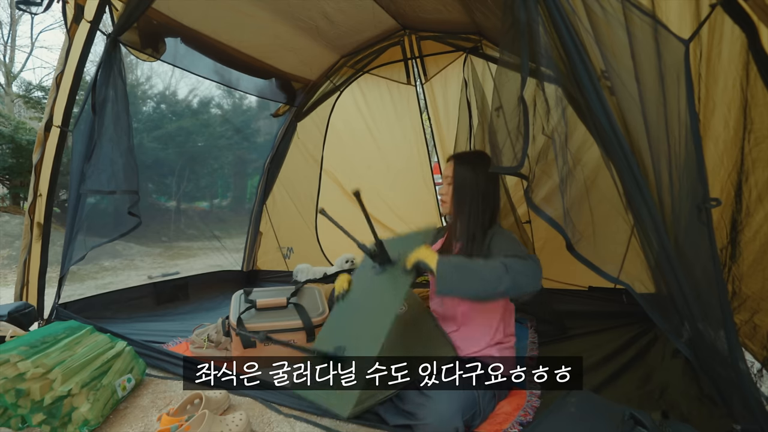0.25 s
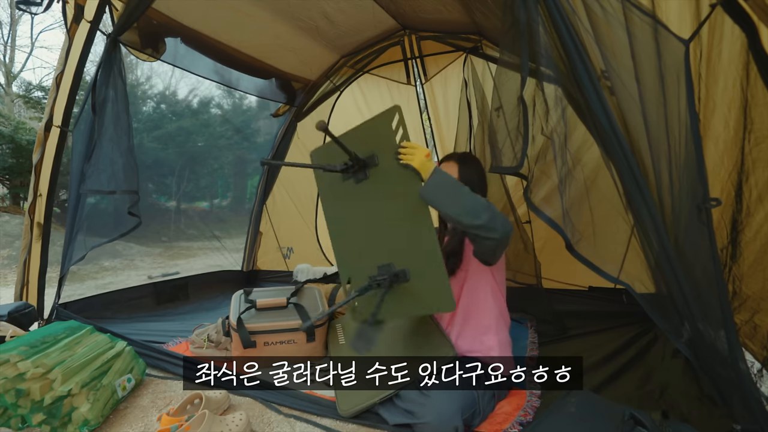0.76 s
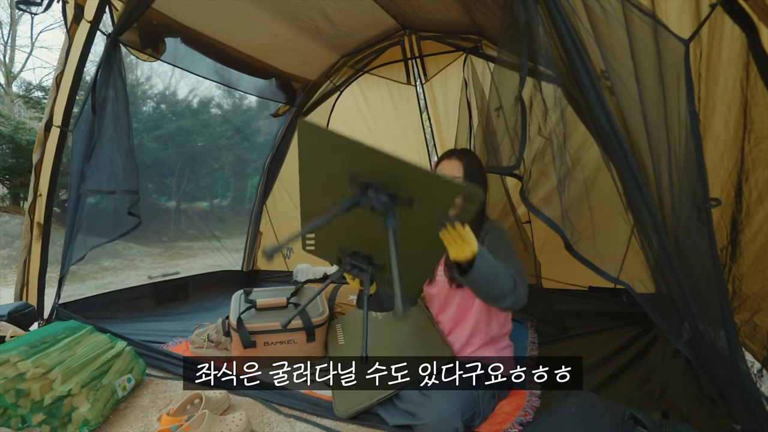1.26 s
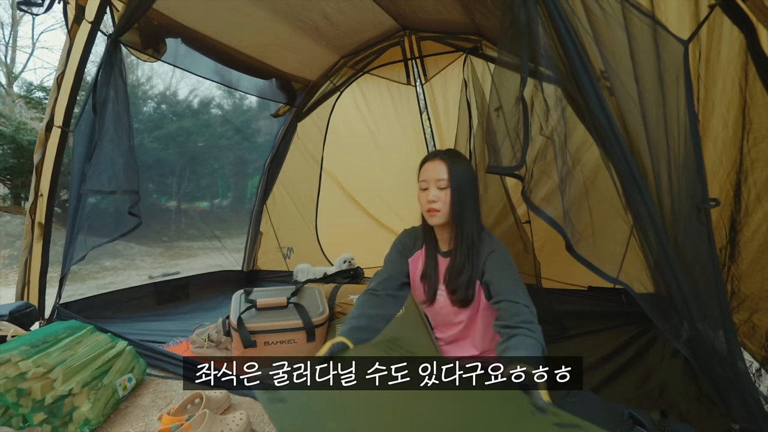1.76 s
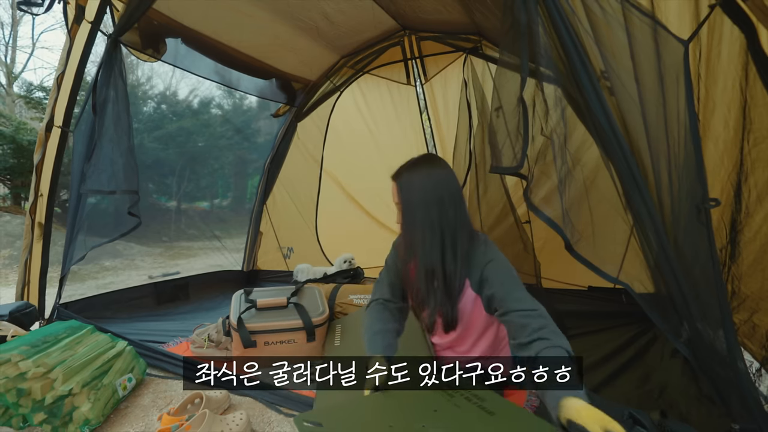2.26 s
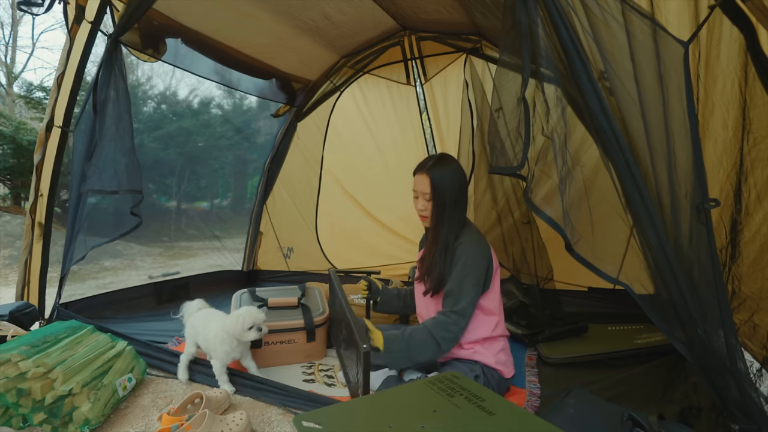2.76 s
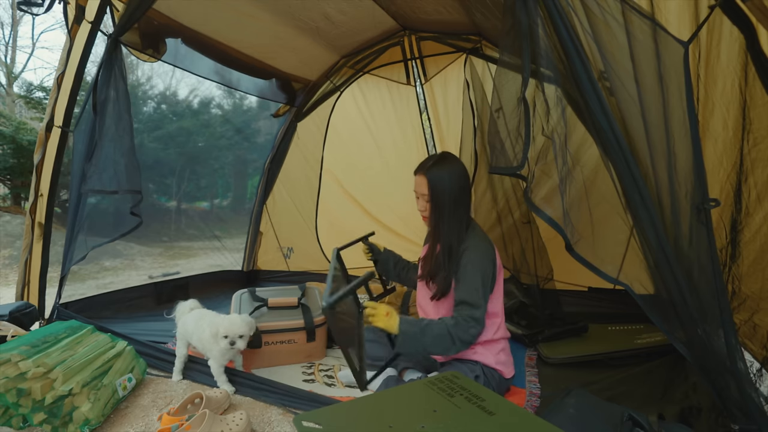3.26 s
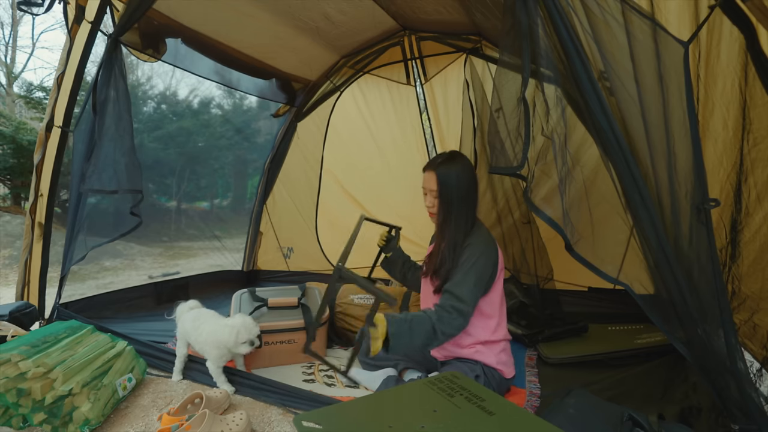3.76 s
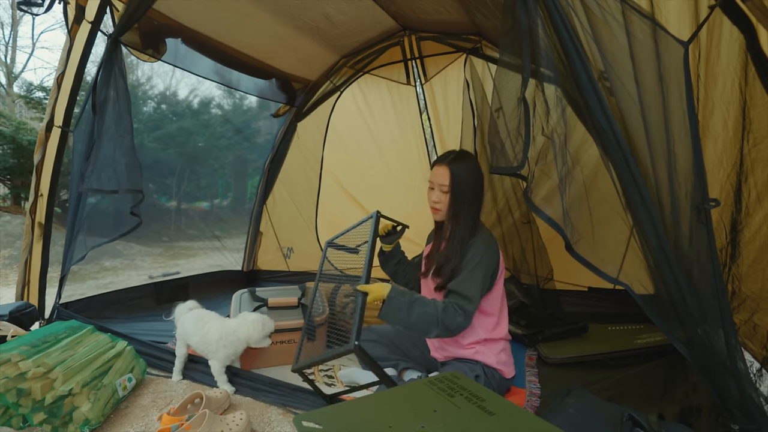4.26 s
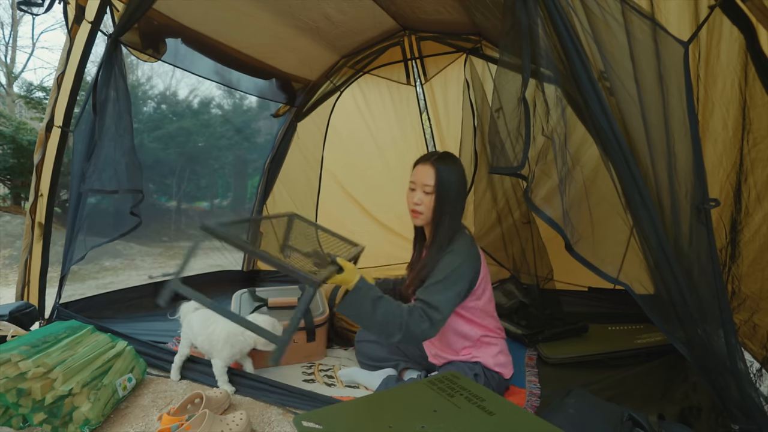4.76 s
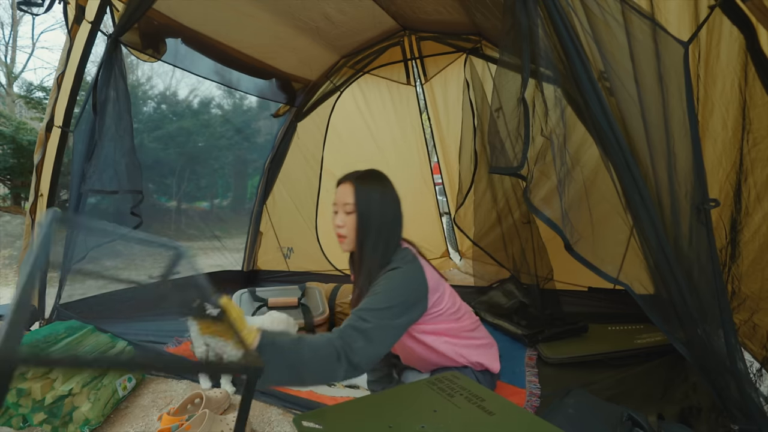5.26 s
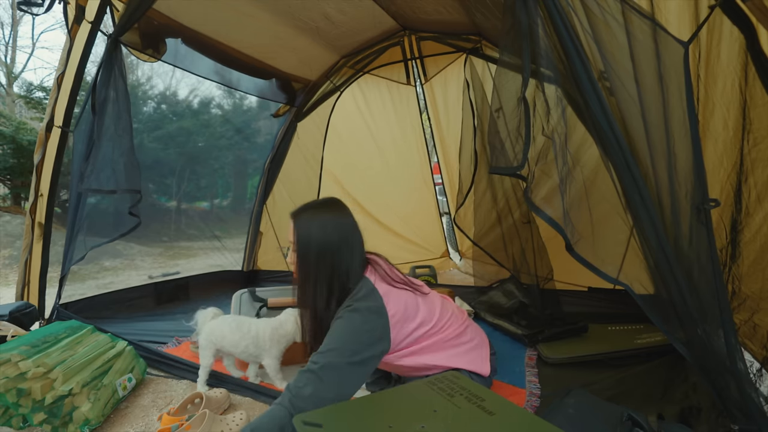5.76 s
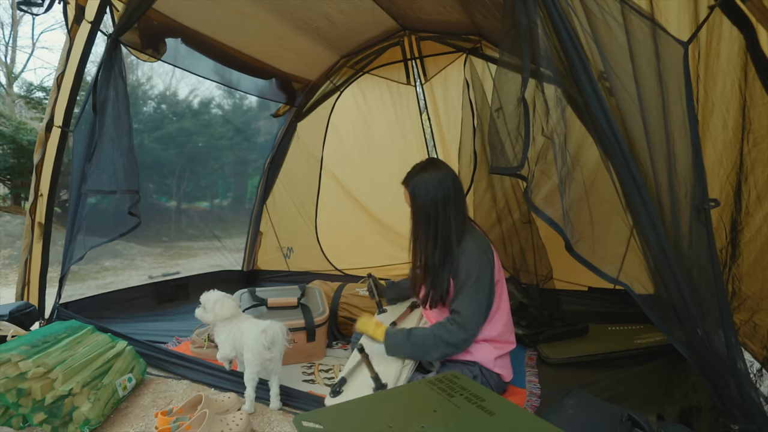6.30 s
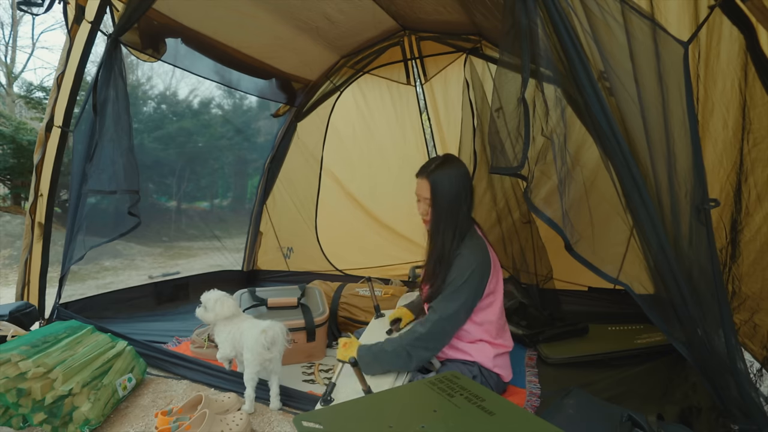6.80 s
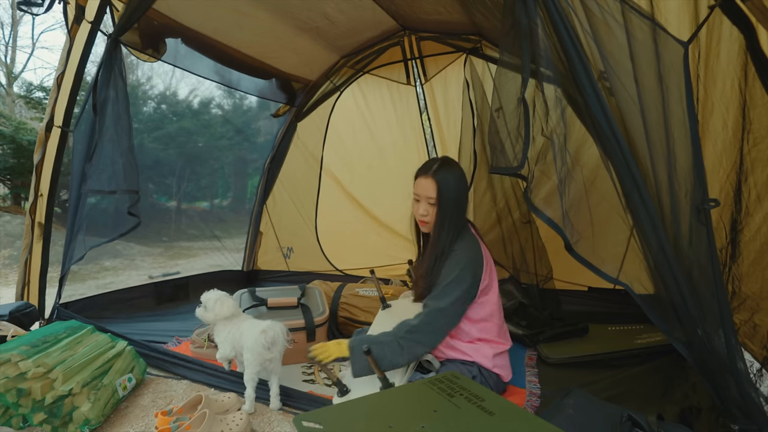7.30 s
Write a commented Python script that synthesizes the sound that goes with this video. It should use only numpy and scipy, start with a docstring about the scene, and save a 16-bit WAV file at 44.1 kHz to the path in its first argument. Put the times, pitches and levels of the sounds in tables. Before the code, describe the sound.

Gloved hands rustle, drag and set up three small camping tables: hollow metal bangs, sharp ringing steel snaps, a deep floor thump, woody knocks.

```python
"""Inside a tent, a few steps from the microphone: faint air and a rustle of sleeves and gloves throughout.
First a metal-topped table is dragged, knocked and stood on its legs: filtered slips, then decaying modes.
Next a steel mesh table clacks as it snaps open, rings, and creaks; wavering tones make the squeaks.
Its feet slap the floor with a thud, a slowly rising swing; last, a small board table is rubbed and knocked."""
import sys
import numpy as np
from scipy import signal
from scipy.fft import rfft, irfft, next_fast_len
from scipy.io import wavfile

SR = 44100
rng = np.random.default_rng(int(sys.argv[2]) if len(sys.argv) > 2 else 0)


def dump(signal):
    """Clip the signal to [-1, 1] and save it as 16-bit WAV at the path in sys.argv[1]."""
    limited = np.clip(np.atleast_2d(signal).T, -1, 1)
    pcm = np.round(limited * 32767).astype(np.int16)
    wavfile.write(sys.argv[1], SR, pcm)


N = 332514  # length in samples


def amp(db):
    """Decibels to gain."""
    return 10 ** (np.asarray(db) / 20)


def unit(x):
    """Scale to rms 1."""
    return x / np.sqrt(np.mean(x ** 2) + 1e-18)


def add(out, s, x):
    """Mix x into out from time s on."""
    i = max(int(s * SR), 0)
    out[i:i + len(x)] += x[:max(N - i, 0)]


def decay(t, t60):
    """Ring dying away by 60 dB in t60 seconds."""
    return np.exp(-np.log(1000) * t / t60)


def bins(size):
    """Frequencies of an FFT, kept above zero."""
    return np.maximum(np.arange(size // 2 + 1) * SR / size, 1)


def shape(f, points, tilt_db=0):
    """Gain at frequencies f of a spectrum, tilted per octave above its first point."""
    hz, db = np.transpose(points)[:2]
    octaves = np.log2(np.maximum(f, hz[0]) / hz[0])
    return amp(np.interp(np.log(f), np.log(hz), db) + tilt_db * octaves)


def colour(x, points, tilt_db=0):
    """Give x a spectrum; rms 1."""
    size = next_fast_len(len(x), True)
    spectrum = rfft(x, size) * shape(bins(size), points, tilt_db)
    return unit(irfft(spectrum, size)[:len(x)])


def walk(rate, size):
    """Random curve: rate normal draws per SR steps, joined by straight lines."""
    place = np.arange(size) * rate / SR
    count = int(place[-1]) + 2
    return np.interp(place, np.arange(count), rng.standard_normal(count))


def tent(x, count=28):
    """Ground, table tops and walls send back early echoes that comb the sound."""
    out = x.copy()
    lags_s = rng.uniform(.001, .03, count)
    for lag_s, sign in zip(lags_s, rng.choice([-1, 1], count)):
        i = int(lag_s * SR) + 1
        out[i:] += sign * 0.48 * np.exp(-lag_s / 0.0083) * x[:-i]
    return out


def friction(size, grain_db):
    """Tiny slips of uneven size, bunched where the surfaces catch."""
    catch_db = 1.6 * walk(55, size)
    return rng.standard_normal(size) * amp(grain_db * walk(900, size) + catch_db)


def strokes(rows, attack_share, release_s):
    """Gain of strokes that gather speed over a share of their length, hold, and die as the hand stops."""
    out = np.zeros(N)
    for s, length_s, db in rows:
        t = np.arange(int(length_s * SR) + SR // 2) / SR
        attack = 1 - np.exp(-t / (attack_share * length_s))
        release = np.exp(-np.maximum(t - length_s, 0) / release_s)
        add(out, s, amp(db) * attack * release)
    return out


def rub(rows, spectrum):
    """A hand's drags: friction, combed by the tent and coloured by the surface it stirs."""
    gain = strokes(rows, attack_share=0.16, release_s=0.06)
    return gain * colour(tent(friction(N, grain_db=2.5)), spectrum)


def contact(f, tilt_db, cut_hz):
    """A softer contact pushes for longer and leaves the high modes still."""
    octaves = np.log2(np.clip(f, 150, None) / 1000)
    return amp(tilt_db * octaves) / np.sqrt(1 + (f / cut_hz) ** 4)


def strike(body, modes, modes_db, crack, ragged_db, tilt_db, cut_hz, rise_s, size=32768, count=1100):
    """One blow: a crowd of weak modes and a few strong ones; rms 1 over the first count samples."""
    t, f = np.arange(size) / SR, bins(size)
    hz, _, t60 = np.transpose(body)
    # the upper modes cluster, with gaps between the clusters
    clusters = amp(ragged_db * walk(700, len(f)) * np.minimum(f / 1500, 1))
    crowd = np.exp(2j * np.pi * rng.random(len(f))) * shape(f, body) * clusters
    crowd *= contact(f, tilt_db, cut_hz) / np.std(irfft(crowd))
    # neighbouring bands of the crowd cross-fade, each with its own decay
    y = np.zeros(size)
    for row, life in zip(np.eye(len(hz)), t60):
        share = np.interp(np.log(f), np.log(hz), row)
        y += irfft(crowd * share) * decay(t, life)
    spots = rng.uniform(-1, 1, len(modes))
    for k, ((mode_hz, db, life), spot) in enumerate(zip(modes, spots)):
        # every mode starts from rest; the place of the blow decides how much it gets
        gain = amp(db + modes_db + 2 * spot) * contact(mode_hz, tilt_db, cut_hz)
        y += (-1) ** k * gain * np.sin(2 * np.pi * mode_hz * t) * decay(t, life)
    y *= 1 + crack * np.exp(-t / 0.0011)  # the direct sound leads the tent's reflections
    y *= 1 - np.exp(-t / rise_s)
    return y / np.std(y[:count])


def blows(rows, body, modes, modes_db, crack, ragged_db):
    """All the blows on one object; modes_db sets its strong modes against the crowd."""
    out = np.zeros(N)
    for s, db, tilt_db, cut_hz, rise_s in rows:
        hit = strike(body, modes, modes_db, crack, ragged_db, tilt_db, cut_hz, rise_s)
        add(out, s, amp(db) * hit)
    return out


def squeal(rows, partials):
    """A gliding, wavering, trembling tone with its partials, blurred twice by the tent's echoes."""
    wobbles_per_s, tremble_db = 450, 3
    out = np.zeros(N)
    for s, length_s, first_hz, last_hz, wobble_hz, db in rows:
        size = int(length_s * SR)
        hz = np.linspace(first_hz, last_hz, size) + wobble_hz * walk(wobbles_per_s, size)
        phase = 2 * np.pi * np.cumsum(hz) / SR
        tone = sum(amp(part_db) * np.sin(multiple * phase) for multiple, part_db in partials)
        tone *= np.hanning(size) * amp(tremble_db * walk(wobbles_per_s, size))
        echoed = tent(tent(np.pad(tone, (0, size))))
        add(out, s, amp(db) * unit(echoed) / np.sqrt(2))
    return out


# outdoor air reaching the microphone: [f/Hz, relative level per Hz/dB]
AIR_SPECTRUM = [(25, -6.5), (50, 4.5), (78, 12.5), (120, 4.5), (250, -9.5), (500, -12.5), (1000, -11),
                (2000, -12), (4300, -8), (5200, -33), (9000, -38), (14000, -21), (16000, -48)]


def air():
    """A faint hiss over a low outdoor rumble, wavering slightly."""
    level_db = -58 + .5 * walk(5, N)
    return amp(level_db) * colour(rng.standard_normal(N), AIR_SPECTRUM)


def fabric():
    """The weave rubs while small creases flick over."""
    creases_per_s, crease_db = 75, -4  # crease level is against the rubbing
    flicks = rng.random(N) < creases_per_s / SR
    creases = flicks * rng.uniform(-0.95, 1, N)
    return unit(friction(N, grain_db=2.5)) + amp(crease_db) * unit(creases)


# arm movements: [t/s, length/s, rustle level/dB, top hiss level/dB], levels before attack and release
ARM_MOVES = [(0, 0.0023, -49, -52.5), (0.134, 0.2, -54, -76), (0.535, 0.11, -57.5, -57.5),
             (0.804, 0.1, -49.5, -54), (1.174, 0.18, -50, -59.5), (1.477, 0.19, -57, -64.5),
             (1.743, 0.22, -56.5, -86), (1.975, 0.29, -48, -76), (2.275, 0.0086, -49.5, -69.5),
             (2.375, 0.34, -51, -46), (2.662, 0.11, -47.5, -60), (2.852, 0.21, -50, -52.5),
             (3.297, 0.19, -59.5, -62.5), (4.033, 0.13, -52.5, -61), (4.164, 0.2, -51.5, -48.5),
             (5.122, 0.12, -51.5, -61), (5.736, 0.09, -54.5, -62), (6.047, 0.0069, -48.5, -56),
             (6.095, 0.43, -62, -61), (6.182, 0.23, -50, -68), (6.41, 0.35, -50.5, -56.5),
             (6.835, 0.25, -51.5, -62.5), (7.03, 0.3, -49, -54), (7.4, 0.088, -58, -68)]
# rustle of sleeves and gloves: [f/Hz, relative level per Hz/dB]
CLOTH_SPECTRUM = [(100, 0), (400, 10), (1100, 7.5), (2200, 5.5), (4000, 5.5), (6500, -3), (9000, -5),
                  (16000, -20.5)]
# top hiss of the cloth: [f/Hz, relative level per Hz/dB]
CLOTH_HISS_SPECTRUM = [(3000, -46.5), (6000, 1.5), (8500, -2.5), (12000, -2.5), (16000, -7)]


def clothes():
    """Arm movements rub cloth on cloth; between them clothes never quite come to rest."""
    fidget_db, fidget_hiss_db = -63, -71
    attack_share, release_s = 0.13, 0.053
    rustle_rows = [(s, length_s, db) for s, length_s, db, _ in ARM_MOVES]
    hiss_rows = [(s, length_s, db) for s, length_s, _, db in ARM_MOVES]
    rustle_gain = np.hypot(strokes(rustle_rows, attack_share, release_s), amp(fidget_db))
    hiss_gain = np.hypot(strokes(hiss_rows, attack_share, release_s), amp(fidget_hiss_db))
    rustle = rustle_gain * colour(tent(fabric()), CLOTH_SPECTRUM)
    return rustle + hiss_gain * colour(tent(fabric()), CLOTH_HISS_SPECTRUM)


# a hand drags over the metal top: [t/s, length/s, level before attack and release/dB]
PANEL_DRAGS = [(0, 0.0055, -53.5), (.2, 0.36, -48), (.778, 0.021, -42.5), (.98, 0.075, -44.5),
               (1.2, 0.025, -50), (1.845, 0.063, -45), (2.16, 0.049, -39.5)]
# low resonances the drag stirs: [f/Hz, relative level per Hz/dB]
PANEL_DRAG_SPECTRUM = [(80, -15.5), (170, 3), (230, -2.5), (310, -8.5), (430, 11), (530, 3.5), (630, -11.5),
                       (750, -2.5), (870, 1.5), (1300, -15.5), (3000, -27)]


def panel_drags():
    """Slips of a glove stir the metal top's low resonances."""
    return rub(PANEL_DRAGS, PANEL_DRAG_SPECTRUM)


# the metal top slides along a sleeve: [t/s, length/s, level before attack and release/dB]
PANEL_SLIDES = [(.17, 0.23, -48.5), (.445, 0.0061, -45.5)]
# metal on cloth: [f/Hz, relative level per Hz/dB]
SLIDE_SPECTRUM = [(1000, -18), (2000, 7), (3400, -3), (4430, 9), (4800, 3), (5200, 11), (5900, 6),
                  (6510, 8), (8000, 2.5), (11000, -13), (16000, -22)]


def panel_slides():
    """Slips of metal along cloth, strongest in the treble."""
    return rub(PANEL_SLIDES, SLIDE_SPECTRUM)


# knocks of the metal top: [t/s, level/dB, tilt/dB per octave, contact cut-off f/Hz, rise/s]
PANEL_KNOCKS = [(.318, -44, 2, 3030, 0.0078), (.348, -47, 11, 4020, .0005), (.452, -46, 1.5, 8000, 0.0041),
                (.5565, -35, 1.5, 3000, 0.0015), (.781, -46, 3, 4000, 0.015), (.930, -38, 8, 696, 0.003),
                (.940, -39, 8.5, 750, 0.00074), (1.018, -40.5, -0.5, 1000, 0.01),
                (1.209, -44, 14, 750, 0.0037), (1.919, -30, 1.5, 7000, 0.0032),
                (1.933, -24.5, -0.5, 6000, 0.0033), (1.949, -38.5, 3.5, 5000, 0.0004),
                (1.988, -32.5, -5, 600, 0.0028), (2.068, -28, -3, 7000, 0.007),
                (2.086, -35, 2.5, 7100, 0.0025), (2.104, -24, 3.5, 9000, 0.025),
                (2.118, -26.5, 5, 7930, 0.0014), (2.138, -25, 3, 4500, 0.0014),
                (2.149, -22.5, -3.5, 1204, 0.0019)]
# crowded weak modes of the metal table: [f/Hz, relative level per Hz/dB, t60/s]
PANEL_BODY = [(62.5, -5, 0.5), (172, -4.5, 0.23), (282, 9, 0.21), (351, -19, 0.18), (411, 3, 0.35),
              (580, -7, 0.16), (660, 2, 0.12), (1210, -5.5, 0.18), (2620, -15, 0.093), (5860, -20, 0.17),
              (15100, -33, 0.086)]
# strong modes of the metal top: [f/Hz, relative level/dB, t60/s]
PANEL_MODES = [(168.9, -2, 0.27), (299.9, 3, 0.36), (407, 7.5, 0.1), (437, -7, 0.36), (510.4, -14.5, 0.34),
               (624.7, 1.5, 0.15), (865, -11, .16), (1195, -17, 0.33), (1424, -15.5, .14)]


def panel_knocks():
    """The metal top bongs on its few strong low modes."""
    return blows(PANEL_KNOCKS, PANEL_BODY, PANEL_MODES, modes_db=2.0, crack=3.6, ragged_db=9.5)


# latch ticks: [t/s, level/dB, tilt/dB per octave, contact cut-off f/Hz, rise/s]
LATCH_TICKS = [(.348, -58, -3, 8000, .0002), (.4985, -53.5, 7, 8000, 0.00022),
               (.930, -50, 5, 14000, 0.00056), (6.3215, -30.5, 1.5, 14000, 0.000037),
               (7.249, -52, 9, 12000, 0.00033), (7.332, -43.5, -7.5, 4500, 0.00027)]
# crowded weak modes of a latch: [f/Hz, relative level per Hz/dB, t60/s]
LATCH_BODY = [(200, -41, 0.045), (2200, -1, 0.12), (3280, 10, 0.3), (6400, -3, 0.22), (10900, 1, 0.13),
              (16000, -15, 0.05)]


def latch_ticks():
    """Small hard parts tick on a crowd of high modes, with no strong one."""
    return blows(LATCH_TICKS, LATCH_BODY, [], modes_db=0, crack=8, ragged_db=2.5)


# squeaks: [t/s, length/s, first f/Hz, last f/Hz, wobble/Hz, relative level/dB]; sounded at 0.98 of these f
SQUEAKS = [(0.549, 0.019, 9800, 8900, 240, -45.5), (0.627, 0.043, 9900, 10400, 730, -57),
           (1.266, 0.039, 6300, 6220, 260, -45.5), (4.234, 0.083, 1244, 986, 69, -47.5),
           (4.555, 0.07, 4530, 4400, 190, -60), (4.57, 0.14, 4100, 3650, 600, -60),
           (4.735, 0.11, 4310, 3990, 700, -63), (4.83, 0.17, 2750, 2420, 230, -65)]


def squeaks():
    """Stick and slip at an unsteady rate gives a thin, wavering tone."""
    return squeal(SQUEAKS, partials=[(0.98, 0)])


# cloth or a foot slides: [t/s, length/s, relative level/dB, tilt/dB per octave]
SWIPES = [(0.773, 0.048, -37, 4.5), (0.794, 0.088, -35, 1), (0.897, 0.023, -42, 15),
          (1.267, 0.048, -41.5, -2), (2.418, 0.085, -43.5, 0.5), (4.191, 0.18, -44, -1.5),
          (5.148, 0.081, -47, -5.5)]
# a swipe before its tilt: [f/Hz, relative level per Hz/dB]
SWIPE_SPECTRUM = [(100, -14), (600, -7), (1500, 1), (4000, 8), (7000, 1.5), (11000, 3.5), (16000, -4)]


def swipes():
    """Each swish is a short swell of friction, tilted dark or bright."""
    out = np.zeros(N)
    for s, length_s, db, tilt_db in SWIPES:
        size = int(length_s * SR)
        slips = friction(size, grain_db=0.0) * np.hanning(size)
        padded = np.pad(slips, (0, size))
        add(out, s, amp(db) * colour(padded, SWIPE_SPECTRUM, tilt_db) / 2)
    return out


# soft pushes on the floor or a table top: [t/s, swing level before the rise/dB, f/Hz, t60/s, rise/s]
THUDS = [(0.933, -36, 64, 0.27, 0.0021), (0.937, -32.5, 173.7, 0.25, 0.0018),
         (0.929, -20, 880, 0.063, 0.0048), (1.203, -37.5, 624, 0.28, 0.0096),
         (1.721, -24, 71.6, 0.35, 0.035), (2.119, -17, 43, 0.15, 0.0038),
         (2.136, -19.5, 64.8, 0.46, 0.0023), (2.142, -10, 297.5, 0.16, 0.011),
         (2.218, -24, 85.5, 0.3, 0.0098), (2.669, -37, 65.5, 0.68, 0.021), (5.666, -1, 82.3, 0.28, 0.034),
         (5.90, -31, 72, 0.39, 0.016)]


def thuds():
    """A soft push builds up slowly and moves only one mode."""
    out, t = np.zeros(N), np.arange(SR) / SR
    for s, db, hz, t60, rise_s in THUDS:
        swing = -np.sin(2 * np.pi * hz * t) * decay(t, t60)
        rise = 1 - np.exp(-(t / rise_s) ** 2)
        add(out, s, amp(db) * swing * rise)
    return out


# knocks of the metal table's legs: [t/s, level/dB, tilt/dB per octave, contact cut-off f/Hz, rise/s]
LEG_KNOCKS = [(2.069, -37, 5, 2500, 0.01), (2.117, -27, 0, 3920, 0.0054),
              (2.146, -30.5, 3.5, 2500, 0.00092), (2.208, -38.5, -6.5, 2000, .001),
              (2.228, -35, 0, 1486, 0.0035)]
# strong modes of the legs: [f/Hz, relative level/dB, t60/s]
LEG_MODES = [(666, -8.5, 0.29), (715, -3, 0.53), (886, -18.5, 0.35), (1002, -0.5, 0.18),
             (1080, -23.5, 0.28), (1117, -3, 0.28), (1172, -1, 0.27)]


def leg_knocks():
    """The legs ring as they land, over the metal table's crowd of modes."""
    return blows(LEG_KNOCKS, PANEL_BODY, LEG_MODES, modes_db=-4, crack=2.0, ragged_db=-1.5)


# clicks of the folded steel frame: [t/s, level/dB, tilt/dB per octave, contact cut-off f/Hz, rise/s]
FOLDED_CLICKS = [(2.513, -34, 8, 15300, 0.0034), (2.583, -33.5, 2.5, 15000, 0.001),
                 (2.6138, -17, 1.8, 16000, 0.00015), (2.6845, -23.5, 1, 13800, 0.00086),
                 (3.0155, -27.5, 1.5, 7960, 0.00011)]
# crowded weak modes of the steel frame: [f/Hz, relative level per Hz/dB, t60/s]
STEEL_BODY = [(100, -28.5, 0.82), (603, -13.5, 0.34), (830, -3.5, 0.29), (1400, -4, 0.18), (1710, 6, 0.21),
              (2020, -6.5, 0.21), (2893, 4, 0.19), (3700, 2.5, 0.18), (4450, -0.5, 0.19), (5760, -6, 0.15),
              (11160, -5.5, 0.099), (15900, -8, 0.077)]
# strong modes while folded: [f/Hz, relative level/dB, t60/s]
FOLDED_MODES = [(931, -10, .85), (1330, -12, .5), (1597, -7, .55), (1790, 0, .3), (1917, 3.5, .6),
                (2466, -6, .4), (2568, -5, .48), (3090, 1, .33), (3200, 2, .2), (3343, 1, .37),
                (3671, 0, .25), (3865, -5, .34), (4204, -7, .22), (4587, -11, .55), (5421, -6, .27)]


def folded_clicks():
    """The folded steel frame clacks and rings."""
    return blows(FOLDED_CLICKS, STEEL_BODY, FOLDED_MODES, modes_db=-17.5, crack=1.1, ragged_db=5)


# click of the half-open frame: [t/s, level/dB, tilt/dB per octave, contact cut-off f/Hz, rise/s]
HALF_OPEN_CLICKS = [(3.191, -43, 1, 3430, 0.0012)]
# strong modes while half open: [f/Hz, relative level/dB, t60/s]
HALF_OPEN_MODES = [(1588, -3, .48), (2460, -3, .28), (2767, 4, .22)]


def half_open_clicks():
    """Half open, the frame rings on other strong modes."""
    return blows(HALF_OPEN_CLICKS, STEEL_BODY, HALF_OPEN_MODES, modes_db=-12, crack=1, ragged_db=3.5)


# clicks of the frame swung open: [t/s, level/dB, tilt/dB per octave, contact cut-off f/Hz, rise/s]
OPEN_CLICKS = [(3.3833, -24.5, -1.5, 6000, 0.000097), (3.3908, -16, 0.92, 13000, 0.000072),
               (3.414, -38.5, 0.065, 9000, 0.00018)]
# strong modes once open: [f/Hz, relative level/dB, t60/s]
OPEN_MODES = [(431, -22, .91), (759, -12, .85), (860, -20, .6), (1109, -9, .35), (1308, -12, .38),
              (1400, -8, .28), (1593, -9, .46), (1720, 1, .12), (2630, 4, .12), (2765, 4, .16),
              (3430, 2, .12), (3690, -3, .13), (3989, -2, .15), (6660, 7, .07)]


def open_clicks():
    """Swung open, the frame snaps and rings differently again."""
    return blows(OPEN_CLICKS, STEEL_BODY, OPEN_MODES, modes_db=-15.5, crack=0.95, ragged_db=6.0)


# frame knocks under gloves or on the floor: [t/s, level/dB, tilt/dB per octave, contact cut-off f/Hz, rise/s]
DAMPED_CLICKS = [(3.953, -44, 4.5, 14300, 0.014), (3.965, -38.5, -7.5, 3460, 0.0049),
                 (4.152, -44, -0.5, 8000, 0.014), (4.396, -50.5, -1.5, 14300, 0.00076),
                 (5.638, -33.5, -1.5, 14300, 0.011), (5.662, -22, 1, 14000, 0.00091),
                 (5.677, -26.5, 14, 14200, 0.0033), (5.683, -22.5, 0.5, 9000, 0.00031),
                 (5.70, -31.5, 9.5, 14000, 0.021)]


def damped_clicks():
    """A gloved grip or a padded floor cuts the long rings of the crowd short."""
    longest_s = 0.17
    body = [(hz, db, min(t60, longest_s)) for hz, db, t60 in STEEL_BODY]
    return blows(DAMPED_CLICKS, body, OPEN_MODES, modes_db=-28, crack=0.38, ragged_db=2.0)


# dry hinge: [t/s, length/s, first base f/Hz, last base f/Hz, wobble/Hz, relative level/dB]
HINGE_CREAKS = [(4.665, 0.082, 760, 780, 28, -57)]
# overtones of the hinge: [multiple of the base f, relative level/dB]
HINGE_PARTIALS = [(4, 0), (5, -7), (7, -9), (8, -7), (9, -5), (10, -12)]


def hinge_creaks():
    """Stick and slip in a dry hinge gives a stack of overtones, without their base."""
    return squeal(HINGE_CREAKS, HINGE_PARTIALS)


# the mesh table's feet on the floor: [t/s, level/dB, tilt/dB per octave, contact cut-off f/Hz, rise/s]
FLOOR_SLAPS = [(5.640, -45, -7, 900, 0.0045), (5.662, -29, -4, 1190, 0.00046),
               (5.678, -33, 4.5, 900, 0.00062)]
# crowded weak modes of the floor: [f/Hz, relative level per Hz/dB, t60/s]
FLOOR_BODY = [(61, -11, 0.2), (158, 5, 0.47), (314, -2, 0.26), (697, -6.5, 0.3), (2000, -39, 0.089),
              (8000, -40, 0.098)]
# the floor's one strong mode: [f/Hz, relative level/dB, t60/s]
FLOOR_MODES = [(713, 0.0039, 0.29)]


def floor_slaps():
    """The feet slap the floor, which answers with low, crowded modes."""
    return blows(FLOOR_SLAPS, FLOOR_BODY, FLOOR_MODES, modes_db=-5.0, crack=0.79, ragged_db=5.0)


# a hand drags over the board top: [t/s, length/s, level before attack and release/dB]
BOARD_DRAGS = [(6.046, 0.011, -44), (6.08, 0.24, -50.5), (6.22, 0.1, -39), (6.3, 0.14, -35),
               (6.47, 0.048, -41.5), (6.61, 0.084, -46), (6.78, 0.28, -52.5), (6.98, 0.16, -51.5),
               (7.1, 0.08, -44), (7.24, 0.085, -41.5), (7.35, 0.075, -51.5)]
# low resonances the drag stirs: [f/Hz, relative level per Hz/dB]
BOARD_DRAG_SPECTRUM = [(70, -25), (150, -5.5), (240, 3.5), (350, -3), (490, 5.5), (700, -8.5), (1150, -6.5),
                       (1700, -14), (4000, -27.5)]


def board_drags():
    """Slips of a glove stir the board's low resonances."""
    return rub(BOARD_DRAGS, BOARD_DRAG_SPECTRUM)


# knocks of the board table: [t/s, level/dB, tilt/dB per octave, contact cut-off f/Hz, rise/s]
BOARD_KNOCKS = [(6.073, -37, 4, 5000, 0.00023), (6.272, -31.5, 0, 700, 0.032),
                (6.309, -22.5, 0.5, 1400, 0.00055), (6.333, -29, -9.5, 1500, 0.0012),
                (6.4342, -17, 3, 1250, 0.00053), (6.684, -34.5, 6, 2300, 0.0034),
                (6.705, -40.5, -14, 900, 0.0018), (6.902, -44, 6, 3000, 0.013),
                (7.14, -35, -6, 1490, 0.014), (7.338, -40.5, -11, 990, 0.012)]
# crowded weak modes of the board: [f/Hz, relative level per Hz/dB, t60/s]
BOARD_BODY = [(60, -35, 0.31), (129, -16, 0.42), (240, 0, 0.17), (490, 5.5, 0.15), (670, -10.5, 0.27),
              (930, -6, 0.15), (1720, -17.5, 0.12), (4040, -29.5, 0.13), (14900, -53, 0.045)]
# strong modes of the board: [f/Hz, relative level/dB, t60/s]
BOARD_MODES = [(399, -5, 0.13), (497, 0, 0.19), (551, 1.5, 0.072), (624, -4, 0.15), (946, -8.5, 0.2)]


def board_knocks():
    """The board knocks dully on short, low modes."""
    return blows(BOARD_KNOCKS, BOARD_BODY, BOARD_MODES, modes_db=-6, crack=2.0, ragged_db=2.5)


def scene():
    """Everything in and around the tent, in one channel."""
    ambience = air() + clothes()
    metal_table = panel_drags() + panel_slides() + panel_knocks() + leg_knocks()
    small_sounds = latch_ticks() + squeaks() + swipes() + thuds()
    mesh_table = folded_clicks() + half_open_clicks() + open_clicks() + damped_clicks()
    mesh_table += hinge_creaks() + floor_slaps()
    board_table = board_drags() + board_knocks()
    return (ambience + metal_table + small_sounds + mesh_table + board_table)[None]


def record(dry):
    """The recorder behind the microphone cuts steeply above 16 kHz."""
    top_cut = signal.ellip(10, .1, 80, 16000, fs=SR, output="sos")
    return signal.sosfilt(top_cut, dry)


dry = scene()
out = record(dry)
dump(out)
```